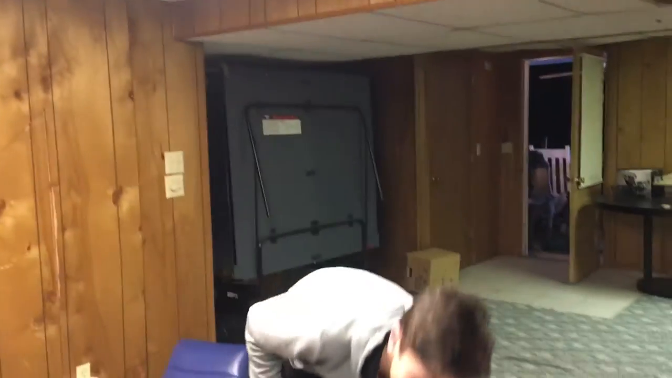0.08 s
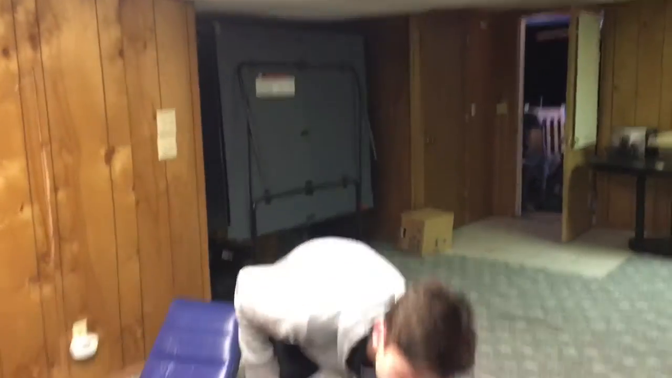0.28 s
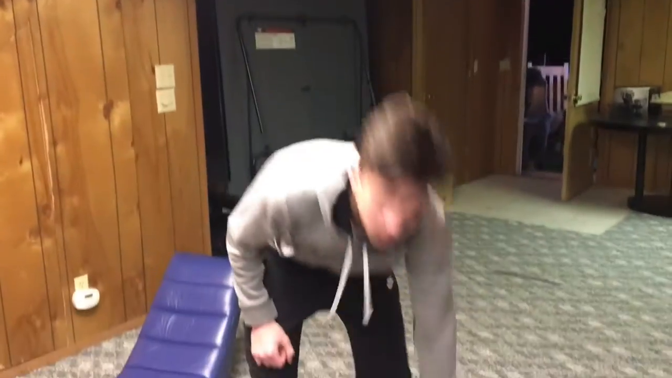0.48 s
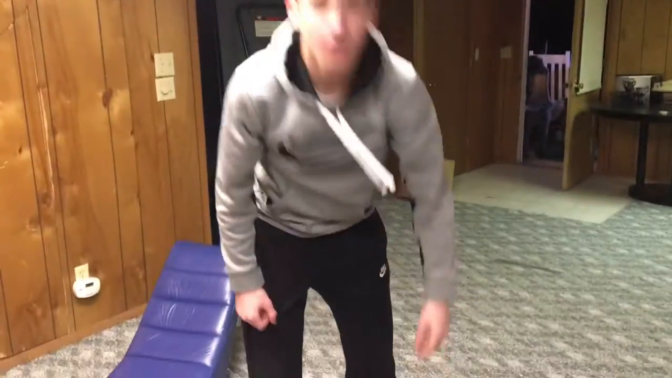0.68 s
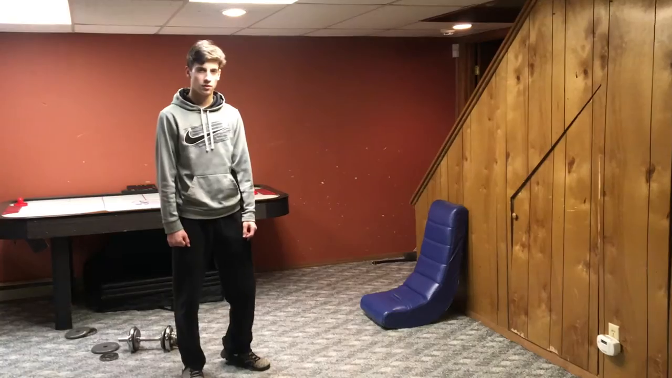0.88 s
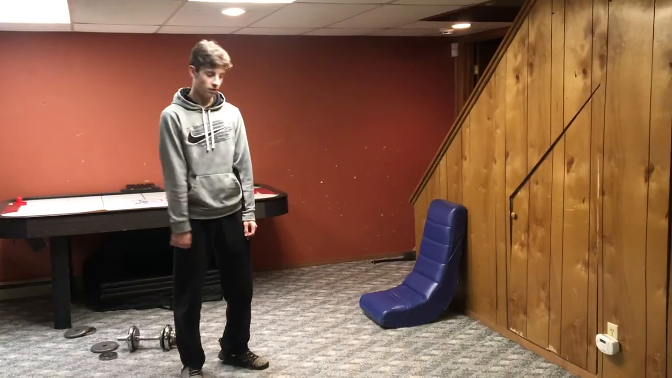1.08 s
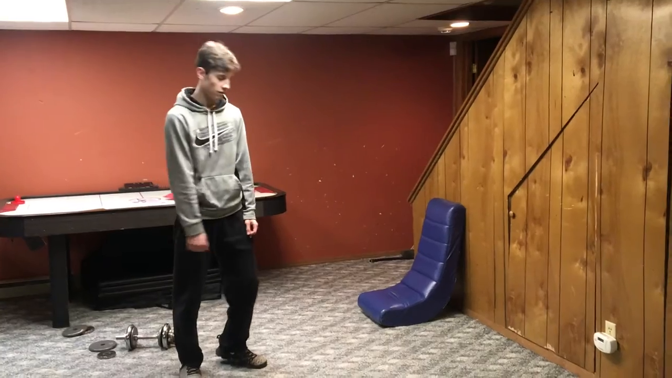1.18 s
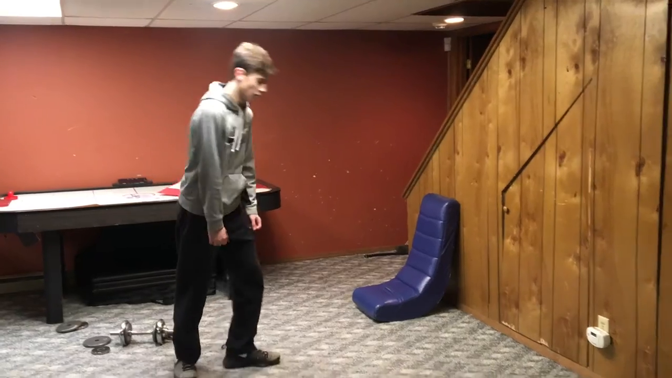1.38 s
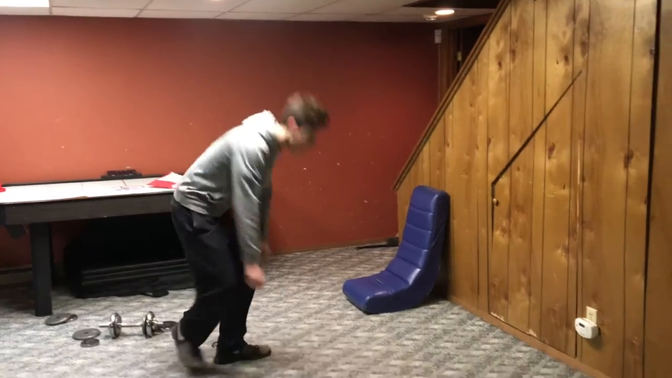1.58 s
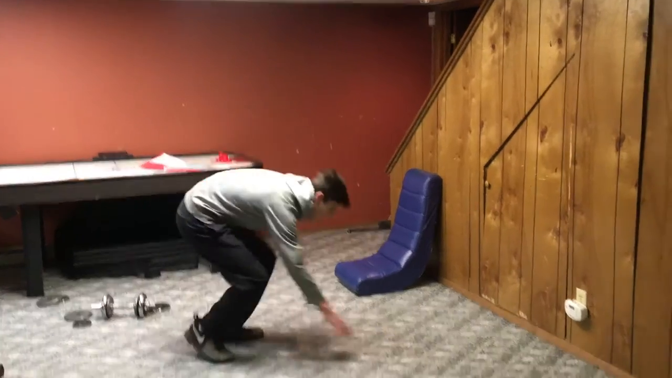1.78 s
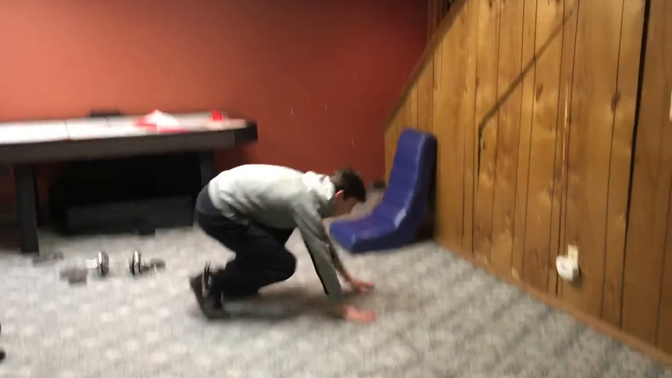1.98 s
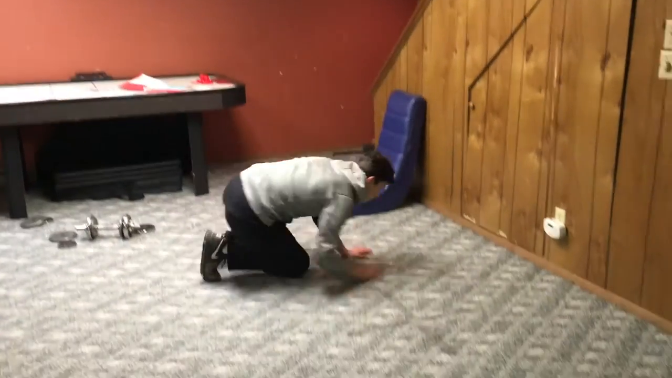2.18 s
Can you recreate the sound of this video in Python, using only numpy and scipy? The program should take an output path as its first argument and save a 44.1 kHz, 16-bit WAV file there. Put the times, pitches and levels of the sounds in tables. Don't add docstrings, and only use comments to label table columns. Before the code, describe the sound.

Metal weight plates clink sharply as a dumbbell is set down, followed by muffled floor knocks

```python
import sys
import numpy as np
from scipy import signal
from scipy.fft import rfft, irfft
from scipy.io import wavfile
from scipy.ndimage import uniform_filter1d

SR = 44100
rng = np.random.default_rng(int(sys.argv[2]) if len(sys.argv) > 2 else 0)


def ratio(d):
    e = np.asarray(d, float) / 20
    return 10 ** e


def put_to_file(sound):
    columns = np.atleast_2d(sound).T
    safe = np.clip(columns, -1, 1)
    whole_steps = np.round(safe * 32767)
    wavfile.write(sys.argv[1], SR, whole_steps.astype(np.int16))


N = 99225
CHANGE_S = .7702
RING, PUFF = 16384, 12288


def band(x, hz, wide):
    r = wide / 2 + np.sqrt(1 + wide ** 2 / 4)
    edges = [hz / r, min(hz * r, .45 * SR)]
    return signal.sosfilt(signal.butter(2, edges, "band", fs=SR, output="sos"), x)


def unit(x):
    return x / np.sqrt(np.mean(x ** 2))


def fall(t60, size):
    return np.exp(-np.log(1000) * np.arange(size) / SR / max(t60, 1e-3))


def add(out, s, x):
    i = int(s * SR)
    out[i:i + len(x)] += x[:N - i]


def walk(rate):
    k = int(SR / rate)
    held = np.repeat(rng.standard_normal(N // k + 1), k)
    return 1.33 * uniform_filter1d(uniform_filter1d(held, k), k)[:N]


def burst(hz, t60, wide, rise=.0005):
    puff = rng.standard_normal(PUFF) * fall(t60, PUFF) * (1 - fall(rise, PUFF))
    return band(puff, hz, wide) * np.sqrt(SR / 2 / hz / wide)


# f/Hz, level/dB per Hz
HOUSE_SPECTRUM = [(16, -55.5), (28, -27), (81, -5), (141, -18), (246, -28), (312, -27.5), (407, -35),
                  (790, -42.5), (15800, -55.5)]


def house():
    f = np.arange(N // 2 + 1) * SR / N + 1
    hz, db = np.array(HOUSE_SPECTRUM).T
    noise = rfft(rng.standard_normal(N)) * ratio(np.interp(np.log(f), np.log(hz), db))
    early_db = 2.5 * (np.arange(N) < CHANGE_S * SR)
    out = np.zeros(N)
    for octave in np.arange(4, 15, .5):
        window = np.cos(np.pi * np.clip(np.log2(f) - octave, -.5, .5)) ** 2
        wander_db = walk(7) * (.4 + 1.2 * (octave < 9))
        out += irfft(noise * window, N) * ratio(wander_db + early_db * (octave > 11))
    return unit(out) * ratio(-61.5)


def hum():
    hz = 60 * (1 + 0.034 * walk(28))
    return np.sin(2 * np.pi * np.cumsum(hz) / SR) * ratio(-65.5 + 2.86 * walk(4.4))


def room(x, send):
    noise = rng.standard_normal(RING)
    low = band(noise, 357.0, 2.0)
    tail = low * fall(.24, RING) + (noise - low) * fall(.26, RING)
    tail = np.r_[np.zeros(int(.008 * SR)), tail / np.sqrt(np.sum(tail ** 2))]
    return x + ratio(-11) * signal.fftconvolve(send, tail)[:N]


# t/s, length/s, level/dB, f/Hz
RUBS = [(0.012, 0.055, -67.5, 1850), (0.082, 0.078, -72.5, 3460), (0.202, 0.038, -77.5, 4250),
        (0.491, 0.042, -65, 1380), (0.573, 0.24, -80, 3010), (.78, 0.18, -77.5, 983),
        (1.087, 0.36, -80.5, 1202), (1.287, 0.11, -75.5, 1670), (1.386, 0.7, -75, 1574),
        (1.622, 0.045, -75.5, 6200), (1.806, 0.022, -67, 3600), (1.798, .03, -72, 1500),
        (1.856, 0.29, -79.5, 900), (1.983, 0.069, -69.5, 2430), (2.003, .14, -79, 8000),
        (2.038, 0.12, -69, 1670), (2.159, 0.19, -67, 3250), (2.148, 0.098, -70, 960)]


def cloth():
    out, wide = np.zeros(N), 1.51
    for s, length, db, hz in RUBS:
        grain = rng.standard_normal(N) * ratio(2.5 * walk(250))
        rub = unit(band(grain, hz, wide)) + ratio(-0.5) * unit(band(grain, hz / 3, wide))
        progress = np.clip((np.arange(N) / SR - s) / length, 0, 1)
        out += ratio(db) * rub * np.sin(np.pi * progress ** 0.86)
    return out


# t/s, level/dB, f/Hz, t60/s
DRY_TICKS = [(0.0223, -60, 2500, 0.015), (2.089, -66, 2000, .03), (2.056, -68, 2200, .02),
             (2.012, -66, 2200, .03), (0.0531, -52.5, 3370, 0.0054), (.0565, -72, 3500, .006),
             (.224, -54.5, 1850, 0.058), (.237, -37, 1000, 0.077), (0.346, -52.5, 1400, 0.24),
             (.369, -39, 1800, 0.069), (0.5234, -52, 3000, 0.0082), (.8655, -61, 1100, 0.09),
             (1.2765, -66, 6090, 0.0092), (1.278, -59, 1300, 0.044), (1.341, -65, 1400, 0.029),
             (1.8704, -63, 876, 0.093), (1.87, -61, 3960, 0.013), (1.801, -64, 810, 0.033),
             (2.001, -65, 3460, 0.035)]


def ticks():
    out = np.zeros(N)
    for s, db, hz, t60 in DRY_TICKS:
        add(out, s, ratio(db) * burst(hz, t60, wide=1.35))
    return out


# t/s, level/dB, f/Hz, t60/s
FLOOR_BLOWS = [(0.021, -51.5, 237, 0.076), (0.038, -52.5, 129.6, 0.18), (.224, -43.5, 300, 0.11),
               (.237, -42, 435, 0.11), (0.24, -40, 363, 0.12), (.239, -41, 150.4, 0.083),
               (.406, -47, 343, 0.037), (0.327, -50, 180, .07), (.36, -53, 270, .08),
               (0.789, -60.5, 163.4, 0.069), (0.865, -63, 520, 0.05), (0.874, -59.5, 128.8, 0.35),
               (1.189, -51, 192.5, 0.058), (1.21, -42.5, 135, 0.059), (1.279, -52.5, 300, 0.09),
               (1.338, -59.5, 261.7, 0.17), (1.437, -44, 70, 0.14), (1.521, -53.5, 154.7, 0.1),
               (1.797, -48.5, 296, 0.048), (1.872, -53, 334, 0.11), (1.898, -53.5, 62, .5),
               (0.63, -58, 55, .3), (.85, -55, 70, .3), (1.996, -49.5, 175.6, 0.21),
               (2.012, -54, 925, 0.09), (2.015, -54, 290, .06), (1.809, -52, 260, .05),
               (2.089, -48, 149.6, 0.13), (2.108, -50, 78, 0.18), (2.198, -61.5, 288, 0.14)]


def knocks():
    out, t = np.zeros(N), np.arange(PUFF) / SR
    for s, db, hz, t60 in FLOOR_BLOWS:
        note = np.sin(2 * np.pi * hz * t) * fall(t60, PUFF) * (1 - fall(t60 * .2, PUFF))
        thud = .4 * burst(hz, t60, wide=.9, rise=t60 * .15)
        add(out, s, ratio(db) * (note * min(1, 450 / hz) + thud))
    return out


# t/s, level/dB, f/Hz, t60/s, width/centre
EDGE_CHINKS = [(.236, -46, 11300, .05, .1), (.236, -50, 6900, .04, .06), (.254, -47, 3600, .24, .14),
               (.254, -48, 4880, .26, .1), (.3365, -36, 3600, .012, .3), (.3375, -48, 2300, .015, .3),
               (.3515, -41, 7200, .01, .22), (.3688, -34, 6000, .012, .25), (.3722, -35, 6200, .012, .2),
               (.369, -51, 12400, .03, .12), (.369, -56, 14600, .025, .06), (.370, -41, 1500, .05, .6),
               (.379, -36, 950, .012, .5), (.4053, -38, 5400, .015, .3), (.4053, -49, 11400, .035, .1),
               (.410, -44, 1800, .1, .25), (.432, -50, 3600, .08, .12), (.25, -47, 2200, .25, 1.4),
               (.254, -55, 5900, .18, .06), (.236, -37, 1750, .05, .35), (.375, -52, 3000, .25, 1.3),
               (.414, -55, 2800, .25, 1.0), (.414, -57, 4800, .3, .06), (.4053, -50, 750, .05, .4)]


def chinks():
    out = np.zeros(N)
    for s, db, hz, t60, wide in EDGE_CHINKS:
        add(out, s, ratio(db) * burst(hz, t60, wide, rise=.001))
    return out


def closing(t, s):
    return np.clip((t - s) / .0015, 0, 1)


def clank(hit, tones, modes, split, chatter, free_s, choked_db,
          twin_db=-11, chatter_share=1, gripped_db=0):
    s, ring_db, crack_db, crack_hz, crack_t60 = hit
    out, t = np.zeros(N), np.arange(RING) / SR
    touch = 1 / (1 + np.exp(np.clip((free_s - t) / .0015, -30, 30)))
    chance = rng.uniform(-1, 1, (len(modes), 4))
    for hz, (db, t60), gap, (scatter, phase, *places) in zip(tones, modes, split, chance):
        if ring_db < -50:
            continue
        starts = [int((1 + place) * (N / 2 - RING / 2)) for place in places]
        shake, sway = (touch * chatter_share * chatter[i:i + RING] for i in starts)
        turn = 2 * np.pi * hz * t + 1.1 * sway
        twin = np.sin(turn + 2 * np.pi * gap * t + np.pi * phase)
        pair = np.sin(turn) + ratio(twin_db) * twin
        choke = choked_db * touch * (1 if hz < 8000 else .45)
        loss_db = choke + 4 * shake + gripped_db
        env = fall(t60, RING) * (1 - fall(0.0017, RING))
        add(out, s, ratio(ring_db + db + scatter + loss_db) * env * pair)
    crack = burst(crack_hz, crack_t60, wide=0.86, rise=.003)
    crack = crack + ratio(-36) * burst(13500, crack_t60, wide=0.3)
    add(out, s, ratio(crack_db + 0.21 * choked_db * touch[:PUFF]) * crack)
    return out


def split_modes(tones):
    return 60 * rng.uniform(-0.7, 1, len(tones))


RIM_TONES = [2040, 3450, 2931, 3142, 3701, 4615, 4930, 5100, 5958, 8290, 8460, 9550, 10725, 11220]
# level/dB, t60/s
RIM_MODES = [(-14, .08), (-7, .05), (-14, .08), (-2, .09), (1, .15), (-11, .2), (-6, .15), (-12, .25),
             (-1, .12), (-14, .1), (-18, .17), (-28, .2), (-26, .11), (-21, .1)]
# t/s, ring level/dB, crack level/dB, crack f/Hz, crack t60/s
RIM_CLANKS = [
    (.2358, -25.5, -29, 3200, .05),
    (.3365, -60, -48, 3300, .016),
]


def rim(chatter):
    split = split_modes(RIM_TONES)
    return sum(clank(hit, RIM_TONES, RIM_MODES, split, chatter, free_s=.0185, choked_db=-21)
               for hit in RIM_CLANKS)


FACE_TONES = [1050, 1650, 3135, 4715, 4770, 5960, 7157, 8459, 10745, 12330, 12850, 13770, 14580]
# level/dB, t60/s
FACE_MODES = [(-18, .04), (-13, .06), (0, .24), (-14, .1), (-17, .25), (-16, .06), (-24, .05), (-32, .13),
              (-32, .1), (-32, .08), (-37, .12), (-40, .1), (-38, .08)]
# t/s, ring level/dB, crack level/dB, crack f/Hz, crack t60/s
FACE_CLANKS = [
    (0.3513, -38, -52, 7380, 0.017),
    (.369, -32, -38, 4500, 0.027),
    (0.3798, -54, -49, 1000, 0.03),
]


def face(chatter):
    split, t, second_s = split_modes(FACE_TONES), np.arange(RING) / SR, FACE_CLANKS[1][0]
    out = np.zeros(N)
    for hit in FACE_CLANKS:
        s = hit[0]
        gripped_db = -30 * closing(t + s, second_s) if s < second_s else -10 * closing(t + s, .406)
        out += clank(hit, FACE_TONES, FACE_MODES, split, chatter, free_s=.011, choked_db=-5,
                     twin_db=-22, chatter_share=.35, gripped_db=gripped_db)
    return out


COLLAR_TONES = [1975, 2295, 3165, 3600, 3690, 1660, 4650, 4825, 5310, 5945, 8358, 8494, 9321, 11500]
# level/dB, t60/s
COLLAR_MODES = [(-9, .08), (-18, .1), (1, .2), (0, .1), (-2, .2), (-18, .3), (-13, .18), (-12, .28),
                (-11, .06), (-7, .18), (-15, .05), (-24, .19), (-29, .15), (-20, .16)]
# t/s, ring level/dB, crack level/dB, crack f/Hz, crack t60/s
COLLAR_CLANKS = [
    (0.4053, -30.5, -38, 3600, 0.056),
    (.422, -66.5, -49, 1860, 0.023),
]
SHRILL_TONES = [9534, 11750, 12360, 13700, 14630]
SHRILL_LEVELS = [-65, -76, -71, -74, -75]


def collar(chatter):
    split, t = split_modes(COLLAR_TONES), np.arange(RING) / SR
    out = sum(clank(hit, COLLAR_TONES, COLLAR_MODES, split, chatter, free_s=.0085, choked_db=-15)
              for hit in COLLAR_CLANKS)
    for hz, db in zip(SHRILL_TONES, SHRILL_LEVELS):
        shake = chatter[int(hz):][:RING]
        tone = fall(0.15, RING) * np.sin(2 * np.pi * hz * t)
        add(out, COLLAR_CLANKS[0][0], ratio(db + 4 * shake) * tone)
    return out


def plates():
    chatter = walk(150)
    return chinks() + rim(chatter) + face(chatter) + collar(chatter)


def scene():
    far = cloth() + ticks() + knocks()
    near = plates()
    return (room(near + far, ratio(-7) * near + far) + house() + hum())[None]


def top_cut(x):
    return signal.sosfilt(signal.butter(12, 15940, fs=SR, output="sos"), x)


def record(dry):
    t = np.arange(N) / SR
    dry = dry - .35 * signal.lfilter(*signal.iirpeak(10600, 8, fs=SR), dry)
    dry = signal.sosfilt(signal.butter(12, 15900, fs=SR, output="sos"), dry)
    fade_in = np.clip((t - CHANGE_S) / .014, 0, 1) ** 1.4
    gain = np.where(t < CHANGE_S, 1, ratio(2.5) * fade_in)
    return top_cut(dry * gain)


dry = scene()
out = record(dry)
put_to_file(out)
```